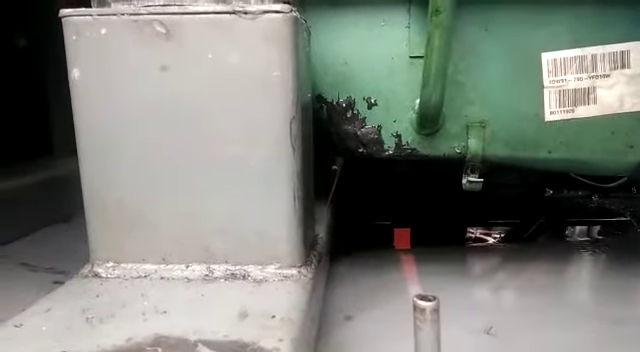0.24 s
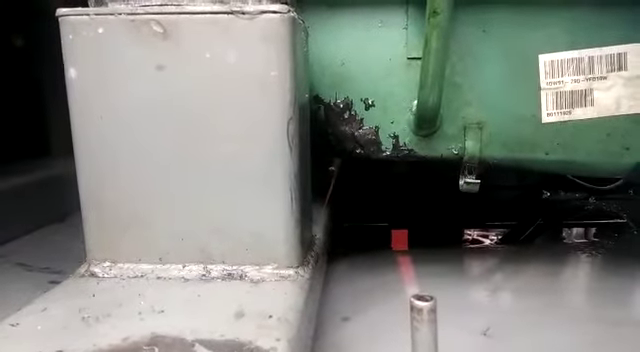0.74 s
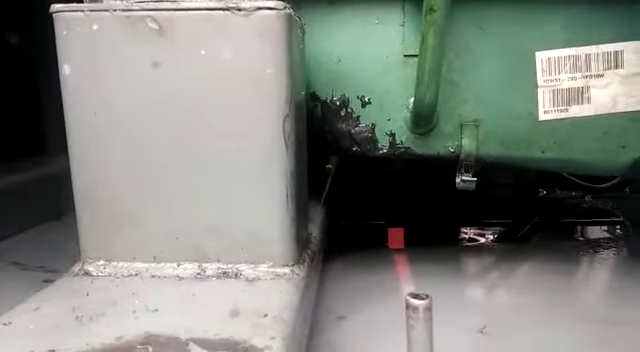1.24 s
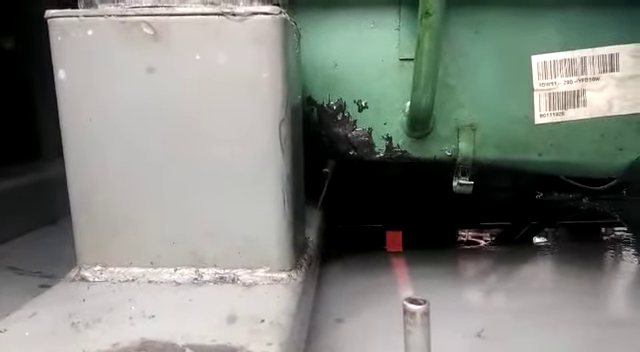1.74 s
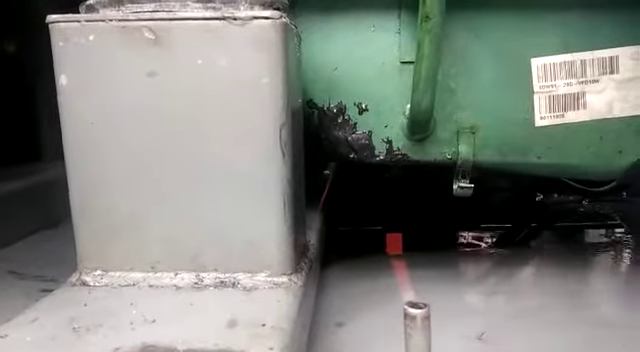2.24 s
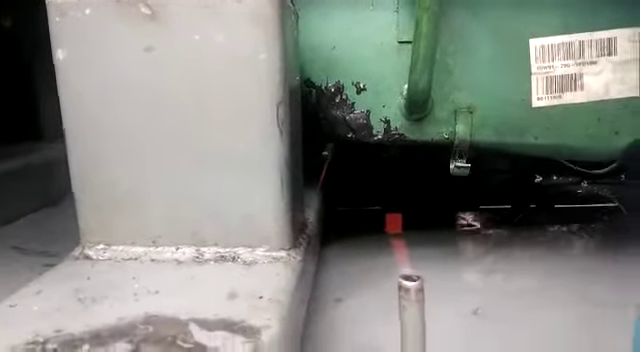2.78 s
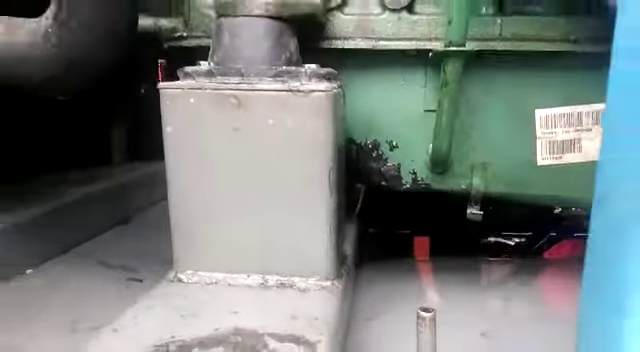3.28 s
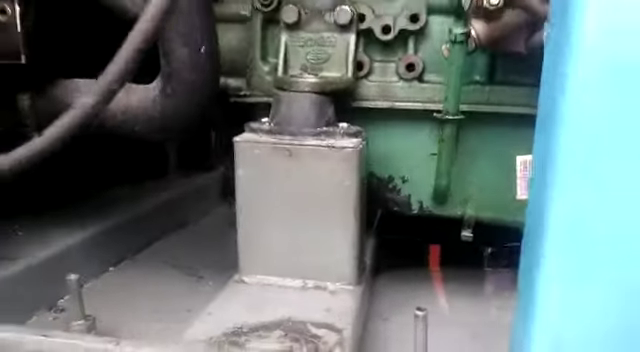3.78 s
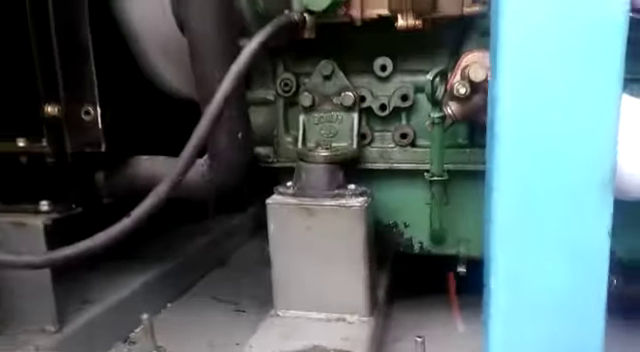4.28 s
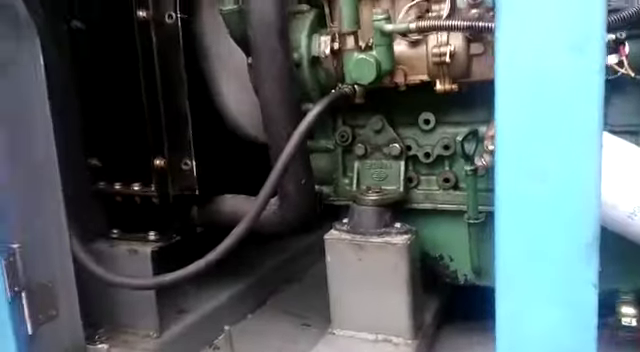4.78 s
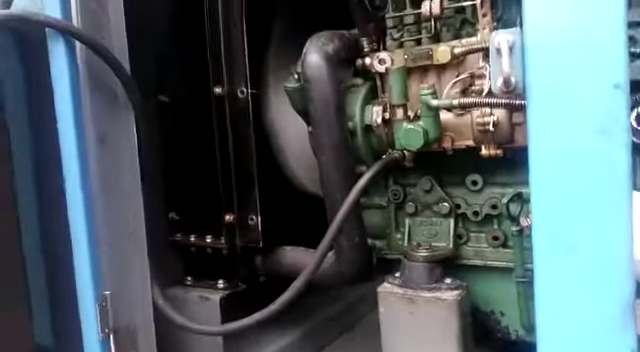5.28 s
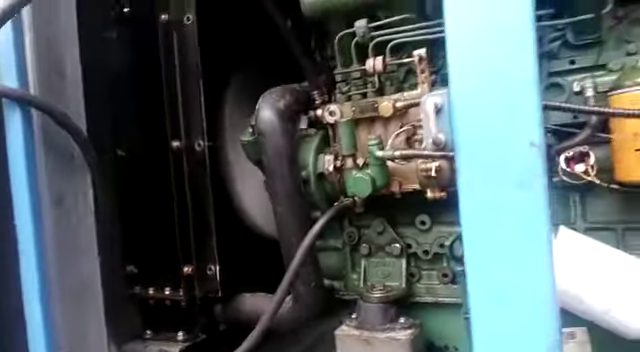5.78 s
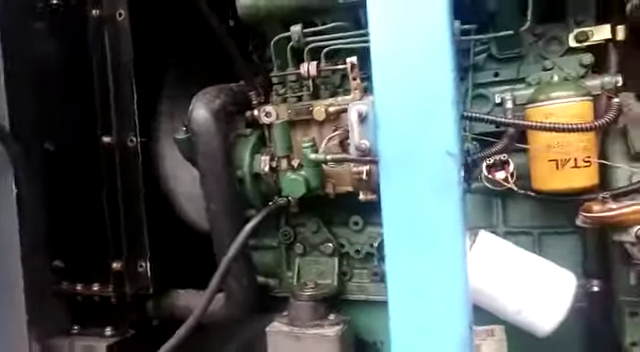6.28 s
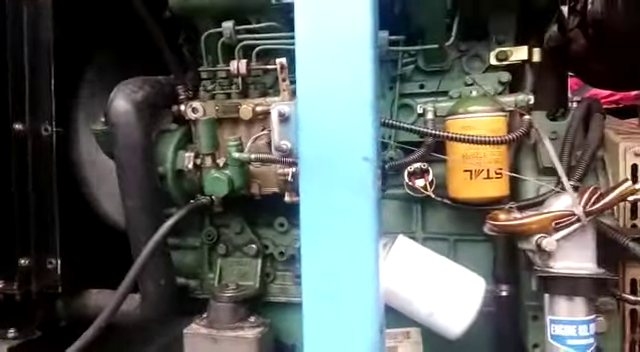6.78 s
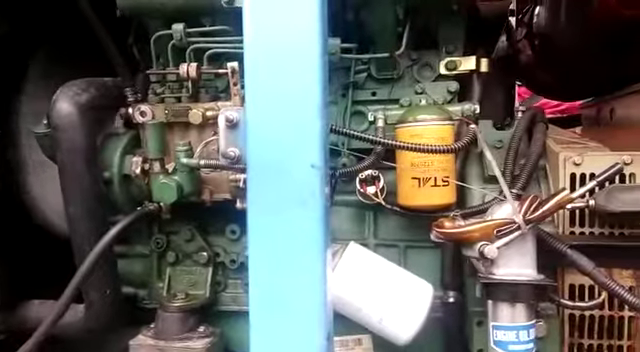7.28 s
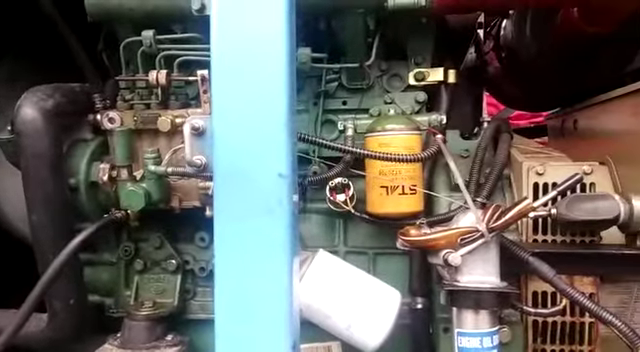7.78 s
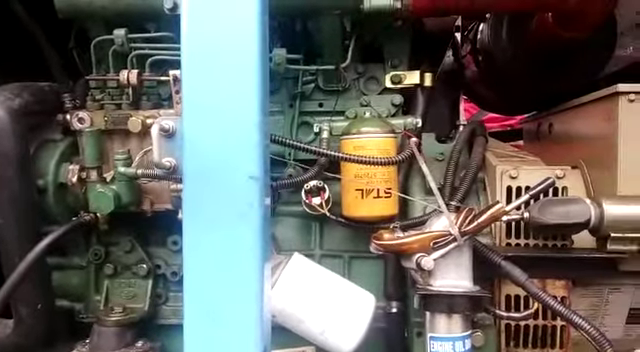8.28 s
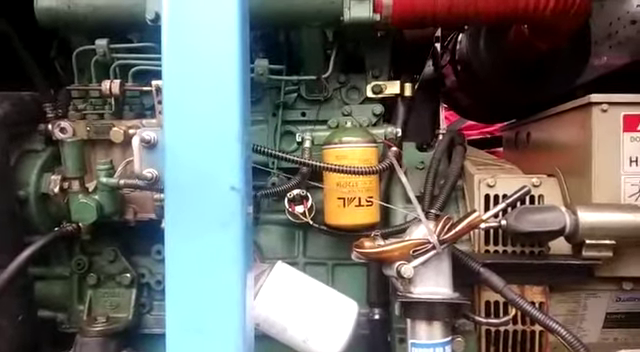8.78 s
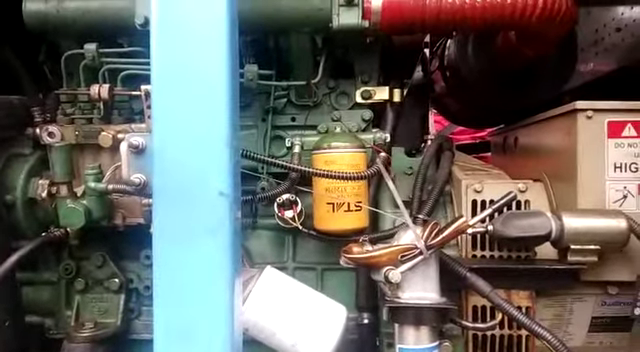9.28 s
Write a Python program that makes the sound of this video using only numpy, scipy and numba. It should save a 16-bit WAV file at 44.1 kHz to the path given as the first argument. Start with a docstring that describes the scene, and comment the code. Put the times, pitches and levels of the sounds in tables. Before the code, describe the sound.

A four-cylinder diesel generator is already running and holds a constant speed for the whole stretch, about nine and a half seconds, heard close up in an open steel housing. A deep, throbbing hum lies under fast, even combustion knocks, tapping valves and a bright injector hiss. The cooling fan adds a drone and a low rush of air, and the panels buzz faintly. For the first 3 seconds the microphone is low beside the engine, where the boom and knock are fullest. From about 3 to 6 seconds it backs away and rises, so the boom softens slightly and the boxy colour of the clatter shifts. From around 5 seconds the injection pump's crisp, rapid spitting comes forward, joined by a fine ringing of fuel pipes by 6.5 seconds. The engine continues steadily with this slightly brighter tone to the end.

```python
"""A deep hum and steady clatter: a four-cylinder diesel generator at governed speed in an open steel housing.
Each firing gives a push of exhaust pressure, a knock of the block, a rattle and a spit of injector hiss.
The fan drones, panels buzz, valves tap and fuel pipes ring; walls and standing waves colour the clatter.
The microphone starts low beside the sump, then backs away and rises to face the injection pump."""
import sys
import numpy as np
from scipy import signal
from scipy.fft import rfft, irfft, next_fast_len
from scipy.io import wavfile
from numba import njit

SR = 44100
rng = np.random.default_rng(int(sys.argv[2]) if len(sys.argv) > 2 else 0)


def store_wav(level_fs):
    """Save 16-bit WAV to argv[1]."""
    pcm = np.round(np.clip(np.atleast_2d(level_fs), -1, 1) * 32767)
    wavfile.write(sys.argv[1], SR, pcm.T.astype(np.int16))


N = 420273
TIME = np.arange(N) / SR
FFT_SIZE = next_fast_len(N + 4096)
BIN_HZ = np.maximum(np.arange(FFT_SIZE // 2 + 1) * SR / FFT_SIZE, 1)
FIRING_HZ = 52.91

# Cylinders in firing order. Each row: knock offset in dB, injector offset in dB.
CYLINDERS = [(0.2, -1.0), (-0.2, -1.7), (1.5, 0.4), (-0.8, 1.5)]
KNOCK_OFFSET_DB, INJECTOR_OFFSET_DB = np.transpose(CYLINDERS)
# Housing panels. Each row: order (multiple of the four-stroke cycle rate), dB at sump, door, pump.
PANEL_ORDERS = [(20, -47, -44, -41), (21, -49, -44, -41), (25, -42, -40, -43), (28, -47, -49, -45),
                (30, -44, -46, -40), (43, -43, -46, -54), (48, -43, -43, -44), (50, -50, -49, -44),
                (52, -41, -52, -44), (53, -41, -46, -44), (58, -41, -45, -49), (62, -49, -45, -43),
                (68, -43, -42, -44), (73, -47, -42, -48), (75, -46, -42, -37.8), (77, -40.5, -42.5, -39.5),
                (79, -41.5, -47, -47), (82, -48, -47, -43.5), (108, -50, -45, -41), (115, -44, -44, -43),
                (118, -42, -43, -48), (119, -42, -43, -47), (121, -48, -44, -39), (128, -47, -41, -46),
                (129, -47, -43, -43), (135, -42, -47, -50)]


def from_db(db):
    """Decibels to gain."""
    return np.exp(np.asarray(db) * (np.log(10) / 20))


def unit_rms(x):
    """Scale to unit power."""
    return x / np.sqrt(np.mean(x ** 2) + 1e-20)


def phase_rad(turns):
    """Phase within the present turn."""
    return (2 * np.pi * (turns % 1)).astype(np.float32)


def over_time(rows):
    """One curve per column after the first, which is in seconds."""
    times_s, *columns = np.transpose(rows)
    return [np.interp(TIME, times_s, column) for column in columns]


def over_bins(points):
    """Join (Hz, dB) points on a log-frequency axis."""
    hz, db = np.transpose(points)
    return np.interp(np.log(BIN_HZ), np.log(hz), db)


def at_place(levels_db, place):
    """Gain from the levels at sump (place 0), door (1) and pump (2 and up)."""
    return from_db(np.interp(place, np.arange(len(levels_db)), levels_db))


def pan(left_db):
    """Left and right gains for a level difference."""
    return from_db(np.array([[.5], [-.5]]) * left_db)


def drift(rate_hz):
    """Random wander of unit RMS."""
    knots = rng.standard_normal(4000)
    return unit_rms(np.interp(TIME * rate_hz, np.arange(len(knots)), knots))


def radiate(pair, colour_db):
    """Two unrelated signals become the direct and the scattered part of one coloured stereo sound."""
    # The housing scatters short waves. Each row: frequency in Hz, side minus mid in dB.
    scatter = [(60, -19), (110, -8), (200, -1), (380, -9), (700, -6.5), (1290, 2), (2380, 0), (15000, 0)]
    # Stereo balance. Each row: frequency in Hz, left minus right in dB.
    balance = [(100, 0.5), (700, 1), (1400, 0), (2300, 5.5), (3200, 4), (4500, 1), (7000, 3.5),
               (10000, 0.5), (14000, -3)]
    mid, side = rfft(np.float32(pair), FFT_SIZE) * from_db(colour_db)
    side = side * from_db(over_bins(scatter))
    spectra = np.array([mid + side, mid - side]) * pan(over_bins(balance))
    out = irfft(spectra, FFT_SIZE)[:, :N]
    return out / np.std(out.mean(axis=0))


def contacts(firings, repeat, points=6672):
    """Metal contact noise: the share `repeat` of its power recurs every cycle, the rest is new."""
    spectrum = np.exp(2j * np.pi * rng.random((2, points // 4 + 1)))
    spectrum[:, [int(row[0]) for row in PANEL_ORDERS]] = 0  # the panels radiate these orders
    patterns = irfft(spectrum, points)
    position = firings / len(CYLINDERS) % 1 * points
    locked = unit_rms(np.array([np.interp(position, np.arange(points), p) for p in patterns]))
    return np.sqrt(repeat) * locked + np.sqrt(1 - repeat) * rng.standard_normal((2, N))


def bursts(firings, cylinder_db, at, rise, fall, uneven_db):
    """One swell per firing; at, rise and fall are shares of the firing interval."""
    count = firings.astype(int)
    strength_db = np.take(cylinder_db, count, mode="wrap") + uneven_db * rng.standard_normal(1000)[count]
    since = firings % 1 - at
    return from_db(strength_db) * np.exp(-np.where(since < 0, since / rise, since / fall) ** 2)


def tones(turns, partials, place, waver_db, skew_rad):
    """Wavering partials of one rotation, each at a different phase left and right."""
    out = np.zeros((2, N))
    for order, *levels_db in partials:
        phase = phase_rad(order * turns + rng.random())
        skew = skew_rad * rng.choice([-1, 1])
        gain = at_place(levels_db, place) * from_db(waver_db * drift(12))
        out += gain * np.cos([phase + skew, phase - skew])
    return np.sqrt(2) * out


def crank(start=.55):
    """Running count of firings; the speed sags slightly until the governor catches it."""
    # Speed sags. Each row: centre in seconds, depth in Hz, half-width in seconds.
    sags = [(2.3, .3, .12), (4.0, .19, .3), (7.45, .14, .45)]
    sag_hz = sum(depth_hz * np.exp(-((TIME - at_s) / half_s) ** 2) for at_s, depth_hz, half_s in sags)
    return start + np.cumsum(FIRING_HZ - sag_hz) / SR


def hum(firings, place, limp=.25, limp_at=.21):
    """Exhaust pressure pulses at each firing; unequal cylinders make its octave swell once a cycle."""
    tone = at_place((-14.5, -14.5, -16), place) * np.sin(2 * np.pi * firings)
    swell = 1 + limp * np.cos(2 * np.pi * (firings - limp_at) / len(CYLINDERS))
    octave = at_place((-15.5, -16.5, -20), place) * swell * np.sin(4 * np.pi * firings + .3)
    return np.sqrt(2) * (tone + octave) * pan(1.77)


def throb(firings, place, deep_at=2.71, boom_at=1.345, boom_order=12):
    """Unequal cylinders give a deep thump and a higher boom per cycle; the steel smears them in time."""
    # Thump partials. Each row: order, relative dB at sump, door, pump.
    partials = [(2, -49, -51, -52), (3, -50, -49, -49), (5, -40, -41, -41), (6, -46, -46, -48),
                (10, -35.5, -34.5, -37), (11, -37, -36, -38.5), (12, -29, -37, -38), (13, -29, -32, -40),
                (14, -31.5, -35, -40.5), (15, -39.5, -41, -41.5), (16, -30.5, -33, -45),
                (17, -38, -40, -41), (19, -46, -44, -49)]
    dispersion_rad = .0907 * (1 + place)  # grows with distance
    out = 0
    for order, *levels_db in partials:
        thump_at = boom_at if order >= boom_order else deep_at  # firings into the cycle
        angle = phase_rad((firings - thump_at) / len(CYLINDERS))
        smear = dispersion_rad * (order - boom_order) ** 2
        out = out + at_place(levels_db, place) * np.cos(order * angle + smear)
    return np.sqrt(2) * out * from_db(-1 + .44 * drift(21)) * pan(1)


def fan(firings, place, blades_per_firing=4.478):
    """The cooling fan drones, belted to the crank; the belt slips a little."""
    # Blade tones. Each row: multiple of the blade rate, dB at sump, door, pump.
    partials = [(1, -29.5, -32.5, -31.5), (2, -38.5, -35.5, -37.5), (3, -38.5, -42, -46.5),
                (4, -46, -58, -44)]
    blades = blades_per_firing * firings + .059 * drift(5)
    return tones(blades, partials, place, waver_db=1.22, skew_rad=.31)


def panels(firings, place):
    """Each housing panel buzzes at one engine order."""
    return tones(firings / len(CYLINDERS), PANEL_ORDERS, place, waver_db=2.13, skew_rad=.16)


def air():
    """A steady low rush of air."""
    # Air spectrum. Each row: frequency in Hz, relative density in dB.
    spectrum = [(15, -1), (30, 0), (70, 3.5), (130, 8.5), (180, 8), (260, -8.5), (400, -11), (800, -4),
                (2000, -69)]
    return radiate(rng.standard_normal((2, N)), over_bins(spectrum))


def block_drone(firings):
    """The low modes of the block ring on from one firing to the next."""
    # Block spectrum. Each row: frequency in Hz, relative density in dB.
    spectrum = [(200, -51), (265, -2), (350, -3.5), (450, -2.5), (550, 1.5), (720, 0), (850, -0.5),
                (1030, -5), (1200, 1.5), (1700, -23.5)]
    swell = bursts(firings, KNOCK_OFFSET_DB, at=.47, rise=.1, fall=.41, uneven_db=1.5)
    return radiate(contacts(firings, repeat=.68) * (1 + .6 * swell), over_bins(spectrum))


def knock(firings):
    """Combustion strikes the block abruptly, in nearly the same way every cycle."""
    # Knock spectrum. Each row: frequency in Hz, relative density in dB.
    spectrum = [(600, -3.5), (900, -11), (1120, 5), (1300, 1.5), (1550, 7), (1800, 0.5), (2000, -1),
                (2500, -10), (4000, -19.5)]
    swell = bursts(firings, KNOCK_OFFSET_DB, at=.52, rise=.1, fall=.34, uneven_db=1.3)
    return radiate(contacts(firings, repeat=.74) * (1 + 1.8 * swell), over_bins(spectrum))


def rattle(firings):
    """Valve gear and pistons clatter, hardest just after each firing."""
    # Rattle spectrum. Each row: frequency in Hz, relative density in dB.
    spectrum = [(1200, -13), (1800, -1), (2100, 0.5), (2900, 0.5), (3600, -2), (4200, -2.5), (4750, -2),
                (5400, -10.5), (6200, -54), (8000, -46)]
    swell = bursts(firings, KNOCK_OFFSET_DB, at=.51, rise=.15, fall=.27, uneven_db=1.6)
    clatter = contacts(firings, repeat=.25) * (1 + .5 * swell)
    return radiate(clatter, over_bins(spectrum)) * from_db(.6 * drift(9.2))


def injectors(firings, spit_db_per_octave=4):
    """Each injection is a short, bright spit over a steady hiss."""
    # Hiss spectrum. Each row: frequency in Hz, relative density in dB.
    spectrum = [(4000, -6), (5700, 1), (6300, 3.5), (7000, 4), (8600, 1.5), (9400, 2), (10300, -1.5),
                (11400, 1), (12600, -0.5), (14000, -2), (16000, -4.5)]
    hiss_db = over_bins(spectrum)
    spit_db = hiss_db + spit_db_per_octave * np.log2(BIN_HZ / 9000)
    swell = bursts(firings, INJECTOR_OFFSET_DB, at=.56, rise=.15, fall=.25, uneven_db=.85)
    spits = radiate(contacts(firings, repeat=.14) * swell, spit_db)
    hiss = radiate(contacts(firings, repeat=.067), hiss_db)
    return spits * from_db(-5.8 + .8 * drift(18)) + hiss * from_db(-1.7 + .7 * drift(18))


def pump(firings, grain_db=.5):
    """Heard in a straight line, the injection pump's spits start abruptly and are bright."""
    # Pump spectrum. Each row: frequency in Hz, relative density in dB.
    spectrum = [(5400, -16.5), (7000, -7), (9800, -6), (10400, -4), (11000, 3.5), (11600, 4.5), (12200, -1),
                (13100, 2), (15500, 1.5)]
    swell = bursts(firings, INJECTOR_OFFSET_DB, at=.47, rise=.08, fall=.38, uneven_db=2.2)
    grains = contacts(firings, repeat=.14) * from_db(-grain_db * rng.standard_normal(N))
    return radiate(grains * (.54 + swell), over_bins(spectrum)) * from_db(drift(20))


def pipes(firings):
    """Each injection sets the steel fuel pipes ringing."""
    # Pipe modes. Each row: frequency in Hz, width in Hz, relative level in dB.
    modes = [(6530, 200, -3), (7370, 540, 2), (8260, 340, 3), (9000, 300, 1), (9750, 520, 0.5)]
    power = sum(from_db(db) ** 2 / (1 + (2 * (BIN_HZ - hz) / width_hz) ** 2) for hz, width_hz, db in modes)
    swell = bursts(firings, INJECTOR_OFFSET_DB, at=.55, rise=.14, fall=.3, uneven_db=2.2)
    drive = contacts(firings, repeat=.23) * (1.3 + swell)
    return radiate(drive, 10 * np.log10(power)) * from_db(1.04 * drift(15))


def taps(firings, place, half_band_octaves=.3):
    """Pistons, valves and needles strike at set crank angles, each with a very short ring."""
    # Each row: firings into the cycle, centre in Hz, ring in seconds, relative dB at sump, door, pump.
    strikes = [(0.01, 9000, .0009, -45, -48, -46), (0.5, 1400, .0012, -38, -39, -43),
               (0.52, 13000, .0009, -55, -52, -39), (1.4, 11000, .0009, -46, -45, -42),
               (1.45, 2700, .003, -35, -40, -41), (2.46, 2700, .002, -39, -42, -35),
               (2.53, 1400, .0012, -34, -39, -42), (3.55, 1900, .002, -38, -37, -42),
               (3.66, 8500, .0009, -44, -45, -38)]
    grains = contacts(firings, repeat=.46)
    out = 0
    for at, hz, ring_s, *levels_db in strikes:
        since_s = (firings - at) % len(CYLINDERS) / FIRING_HZ
        decay = np.exp(-np.minimum(since_s / ring_s, 20))
        snap = grains * decay * from_db(1.6 * drift(14))
        edges_hz = hz * 2.0 ** np.array([-half_band_octaves, half_band_octaves])
        ring = signal.lfilter(*signal.butter(1, edges_hz, "band", fs=SR), snap)
        out = out + at_place(levels_db, place) * unit_rms(ring)
    return from_db(-1) * out


def walls(x, place):
    """Close steel walls comb the clatter; the comb shifts as the microphone moves."""
    # Reflections. Each row: delay at the sump in ms, change in ms per place step, relative gain.
    reflections = [(1.45, .3, .17), (2.65, -.3, -.22), (6.1, -.45, .19), (17.8, .7, -.2)]
    out = x.copy()
    for delay_ms, change_ms, gain in reflections:
        emitted_s = TIME - (delay_ms + change_ms * place) / 1000
        out += gain * np.array([np.interp(emitted_s, TIME, side) for side in x])
    return out * np.std(x) / np.std(out)


@njit
def resonate(x, step, damping):
    """Unit-gain resonance; moving centre (step) and width (damping) in radians per sample."""
    out = np.empty_like(x)
    for side in range(len(x)):
        low = band = 0.
        for i in range(len(step)):
            out[side, i] = band
            low += step[i] * band
            band += damping * (x[side, i] - band) - step[i] * low
    return out


def cavity(x, place):
    """Standing waves in the housing colour the sound near the microphone; some glide as it passes."""
    # Each row: frequency in Hz, glide in Hz per place step, width in Hz, lift in dB,
    # place where strongest, reach in place steps.
    standing_waves = [(360, 0, 90, -4.5, 2.7, 1), (500, 80, 60, 5.5, 1.4, .55), (710, 0, 60, 4.5, 0.2, .55),
                      (925, 150, 75, 6.5, 1.45, .45), (1030, 0, 45, 5, 0, .5), (1005, 0, 50, 4, 2.6, 1),
                      (1190, 55, 150, -5, 2.2, 1.5), (1420, 0, 90, -5, 0, .45), (1400, 40, 64, 6, 1.8, .5),
                      (1565, 0, 65, 7, .7, .65), (1600, 0, 80, 7, 2.65, .6), (1710, 0, 50, 10, .5, .28),
                      (1785, 0, 70, 5, .25, .5), (1705, -30, 55, 6, 2.1, .6), (2150, 0, 70, 4, 2.8, .6),
                      (2000, 0, 90, -3, 2.9, .8), (2430, 0, 200, -4, .7, .3), (4730, 0, 440, 1.5, 3, .6),
                      (4170, 0, 300, -9, 3.1, .7)]
    for hz, glide_hz, width_hz, lift_db, strongest, reach in standing_waves:
        away = place - strongest
        step = 2 * np.sin(np.pi * (hz + glide_hz * away) / SR)
        lift = from_db(lift_db * np.exp(-(away / reach) ** 2))
        x = x + (lift - 1) * resonate(x, step, 2 * np.pi * width_hz / SR)
    return x


def scene():
    """The crankshaft times the engine's sounds; the microphone's place sets the balance."""
    # Microphone path. Each row: time in seconds, place (0 sump, 1 door, 2 to 3 along the pump).
    path = [(0, 0), (2.7, 0.12), (3.8, 1), (4.6, 1.7), (5.6, 2.5), (9.5, 3)]
    # Line of sight to the microphone. Each row: time in seconds, pump gain, pipe gain.
    exposure = [(3.9, 0.25, 0.17), (4.8, 0.41, 0.41), (5.3, 0.84, 0.29), (5.9, 0.56, 0.47),
                (6.5, 0.97, 0.97), (9.5, 0.94, 1.03)]
    place, = over_time(path)
    pump_view, pipes_view = over_time(exposure)
    firings = crank()
    tonal = hum(firings, place) + throb(firings, place) + fan(firings, place) + panels(firings, place)
    rush = at_place((-29.5, -31, -33), place) * air()
    block = at_place((-27.5, -28, -29), place) * block_drone(firings)
    block += at_place((-29.5, -34.5, -32), place) * knock(firings)
    valves = at_place((-22, -23.5, -22.5), place) * rattle(firings)
    fuel = from_db(-22) * injectors(firings) * pan(-4)
    fuel += from_db(-23.5) * pump_view * pump(firings) * pan(-8)
    fuel += from_db(-23.5) * pipes_view * pipes(firings) * pan(-4)
    clatter = block + taps(firings, place) + walls(valves + fuel, place)
    return tonal + rush + cavity(clatter, place)


def record(dry, cutoff_hz=15800):
    """Clip at full scale, then cut the top steeply."""
    lowpass = 1 / np.sqrt(1 + (BIN_HZ / cutoff_hz) ** 600)
    return irfft(rfft(np.clip(dry, -1, 1), FFT_SIZE) * lowpass, FFT_SIZE)[:, :N]


dry = scene()
out = record(dry)
store_wav(out)
```